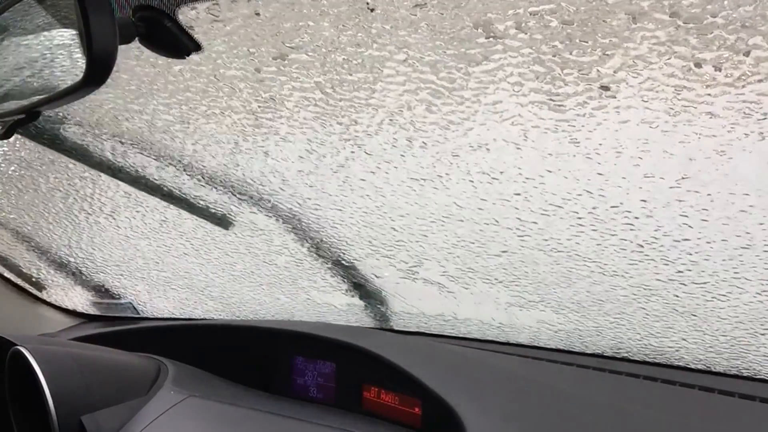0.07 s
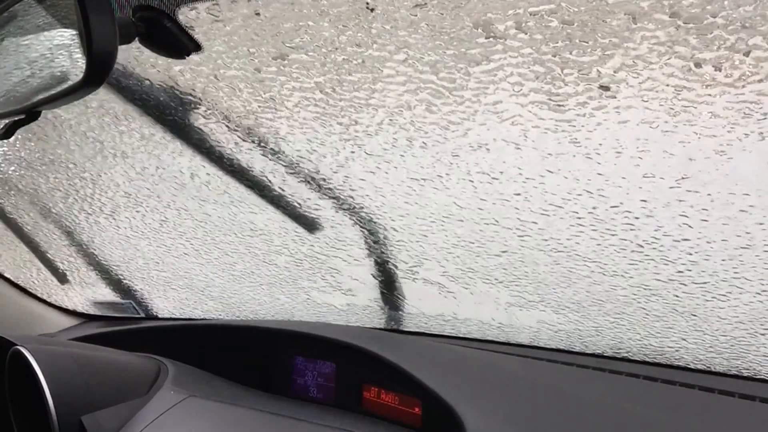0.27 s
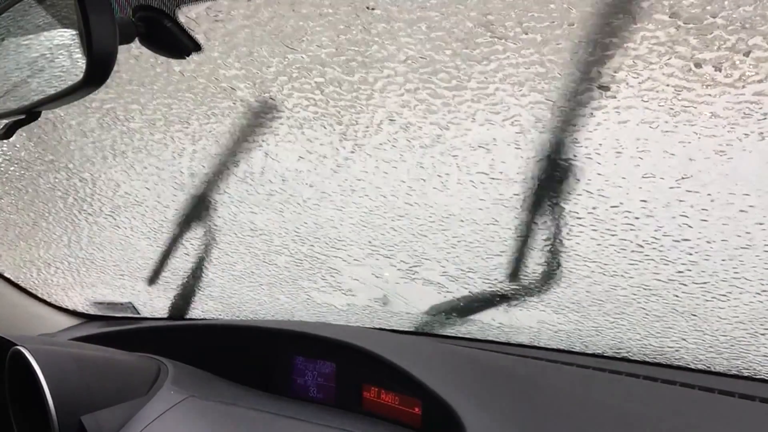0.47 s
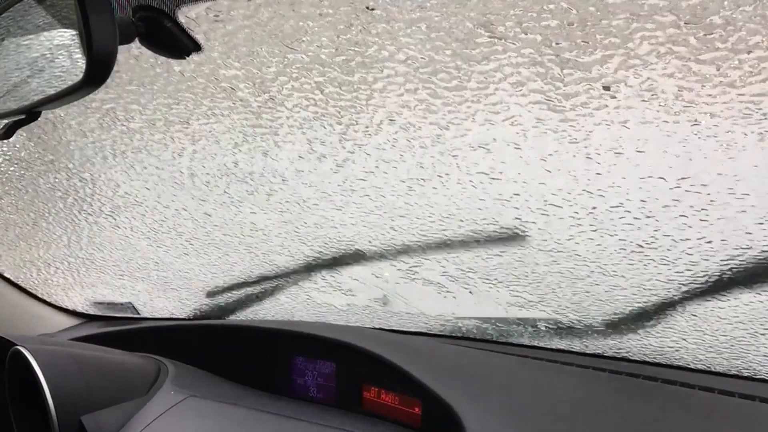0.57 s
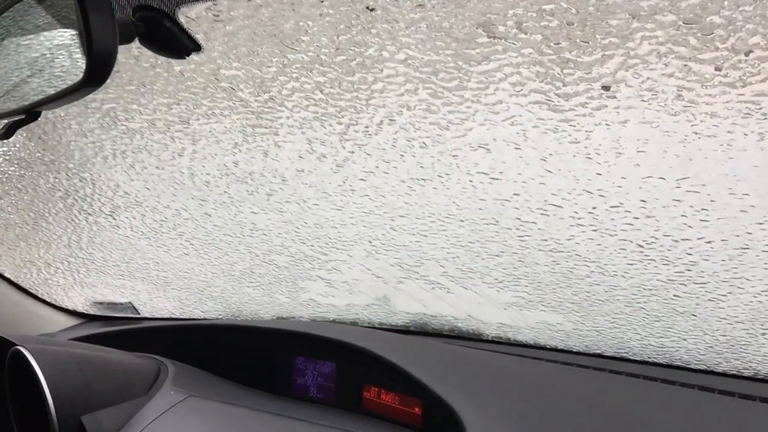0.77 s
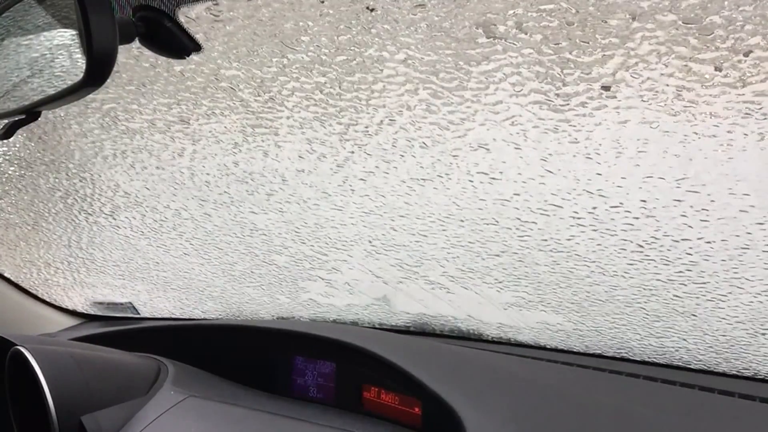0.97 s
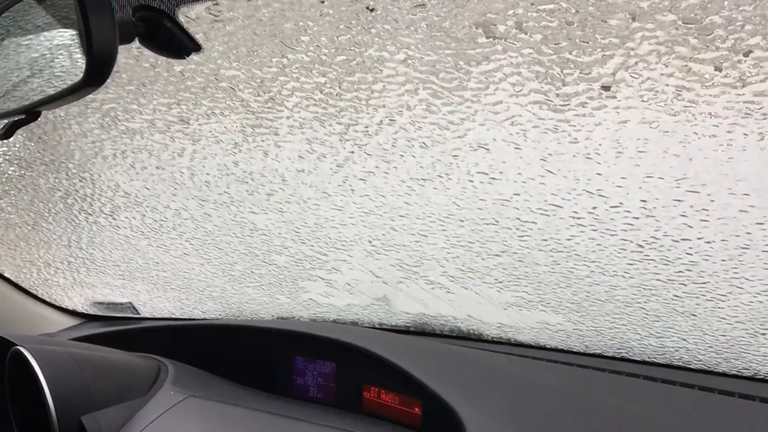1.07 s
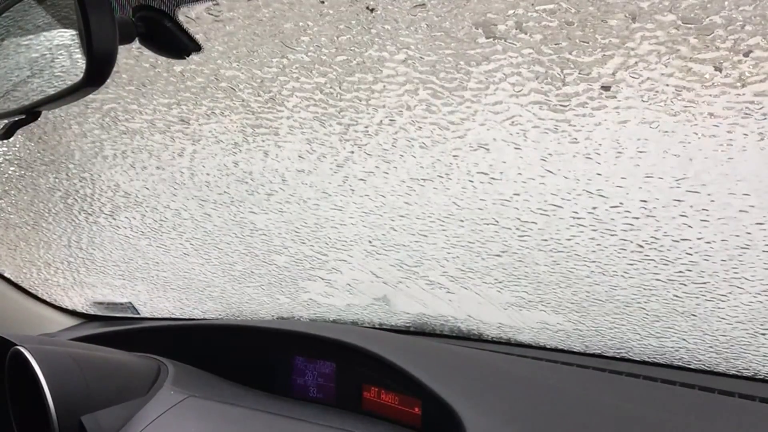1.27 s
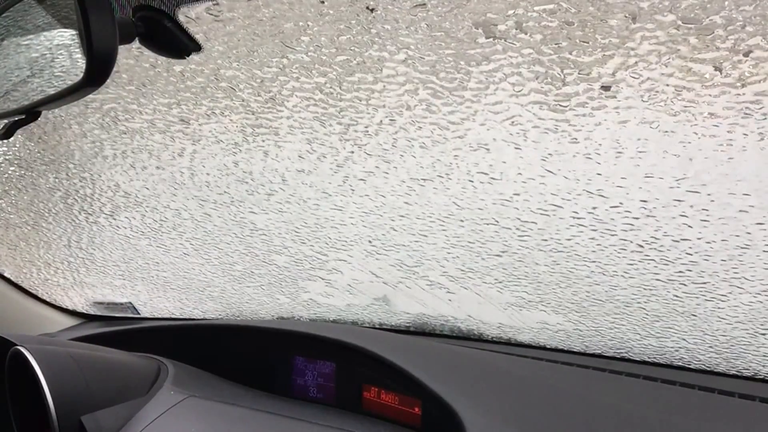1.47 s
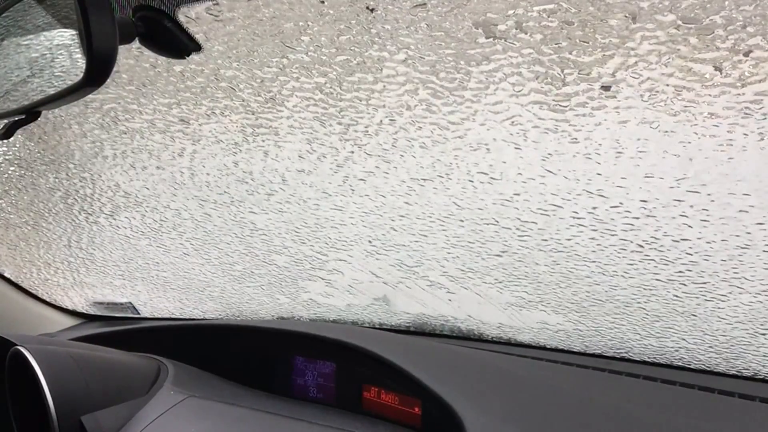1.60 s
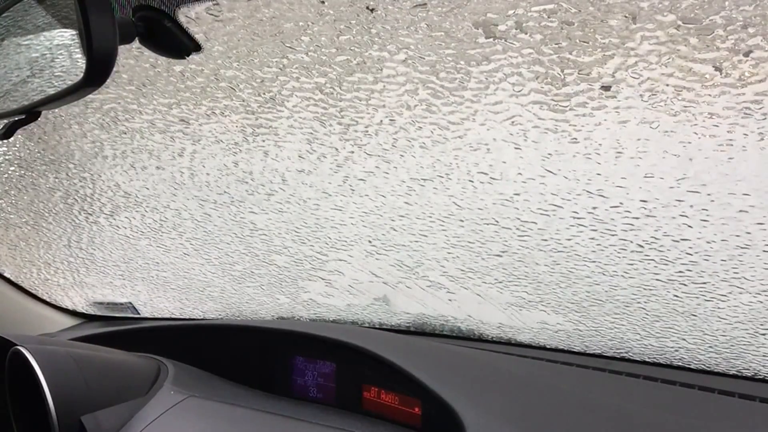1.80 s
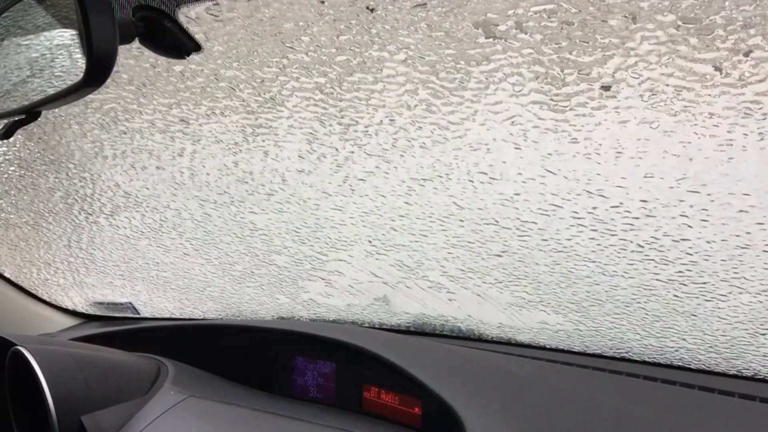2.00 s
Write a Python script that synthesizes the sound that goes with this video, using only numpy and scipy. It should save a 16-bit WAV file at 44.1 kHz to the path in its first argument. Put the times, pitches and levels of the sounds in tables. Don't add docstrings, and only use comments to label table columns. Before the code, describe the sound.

Wiper blades scrape over a frozen windshield, heard close inside a car. A coarse, juddering rasp ends by 0.2 seconds; light clinks and a low thump mark the turnaround. From 0.27 a longer gritty scrape with small squeaks and crackling ice runs to a heavy knock near 0.83, then a brief creep and clunk at 0.94. Afterwards quiet low engine rumble, faint fan hiss, soft body nudges and tiny sleet ticks until 2 seconds.

```python
import sys
import numpy as np
from scipy import signal
from scipy.fft import rfft, irfft, next_fast_len
from scipy.io import wavfile
from scipy.ndimage import uniform_filter1d, map_coordinates

SR = 44100
rng = np.random.default_rng(int(sys.argv[2]) if len(sys.argv) > 2 else 0)


def amplitude_ratio(level_db):
    exponent = np.asarray(level_db, float) / 20
    return 10 ** exponent


def transcribe(u):
    v = np.clip(np.atleast_2d(u).T, -1, 1)
    q = np.round(v * 32767).astype(np.int16)
    wavfile.write(sys.argv[1], SR, q)


N = 90184


def unit(x):
    return x / np.sqrt(np.mean(x ** 2) + 1e-20)


def along(points, hz):
    f, v = np.transpose(points)
    return np.interp(np.log(hz + 1), np.log(f + 1), v)


def wobble(rate):
    knots = rng.standard_normal(int(N * rate / SR) + 4)
    return map_coordinates(knots, [np.arange(N) * rate / SR])


def filtered(x, response):
    m = next_fast_len(N + 8192)
    return irfft(rfft(x, m) * response(np.fft.rfftfreq(m, 1 / SR)), m)[..., :N]


def add(track, s, sound):
    part = track[round(s * SR):][:len(sound)]
    part += sound[:len(part)]


def overlay(start, grains):
    at = start[:, None] + np.arange(grains.shape[1])
    total = np.bincount(at.ravel(), grains.ravel(), minlength=N)[:N]
    return total / np.std(total[:SR])


def ring(hz, t60, attack_s):
    t = np.arange(SR // 4) / SR
    return np.sin(2 * np.pi * hz * t) * amplitude_ratio(-60 * t / t60) * (1 - np.exp(-t / attack_s))


def held_notes(rows):
    t = np.arange(N) / SR
    out = np.zeros(N)
    for s, db, hz, length in rows:
        swell = amplitude_ratio(db + 1.5) * np.sqrt(2) * np.exp(-((t - s) / length) ** 2)
        out += swell * np.sin(2 * np.pi * hz * (t - s))
    return out


def patchy(depth_db):
    z = signal.stft(rng.standard_normal(N + SR), nperseg=1024)[2]
    field = uniform_filter1d(rng.standard_normal(z.shape), size=7, axis=0)
    field = uniform_filter1d(field, size=8, axis=1)
    return signal.istft(z * amplitude_ratio(depth_db * unit(field)), nperseg=1024)[1][:N]


# multiple of the shaft rate, level in dB.
SHAFT_ORDERS = [(1, -63), (2, -55), (4, -67), (5, -62), (6, -63), (7, -66), (10, -64), (21, -72), (22, -73)]
# frequency in Hz, level in dB per Hz.
RUMBLE_SPECTRUM = [(30, 0.5), (45, 2.5), (118, -0.5), (148, -9), (420, -11), (500, -20), (620, -16),
                   (950, -24)]
# frequency in Hz, level in dB per Hz.
FAN_SPECTRUM = [(900, -7.5), (1450, -14), (4200, -23), (4550, -25.5), (5000, -25.5), (9000, -31),
                (10500, -34.5), (12500, -34.5)]


def idle():
    shaft_hz, boom_hz, boom_db, throb_hz = 40.25, 112, -57, 23.4
    rumble_db, fan_db = -47.5, -69
    t = np.arange(N) / SR

    turn = 2 * np.pi * np.cumsum(shaft_hz * (1 + 0.0017 * wobble(3.18))) / SR
    hum = np.zeros(N)
    for k, db in SHAFT_ORDERS:
        level = amplitude_ratio(db + 3 + 4 * wobble(8.2))
        hum += level * np.sin(k * turn + 7 * rng.random() + 0.48 * wobble(14))

    lope_db = 4 * np.cos(2 * np.pi * 11 * t)
    boom_level = amplitude_ratio(boom_db + lope_db + 2.5 * wobble(9.5))
    boom = boom_level * np.sin(2 * np.pi * np.cumsum(boom_hz * (1 + 0.036 * wobble(8.2))) / SR)

    throb_db = 1.5 * np.sin(2 * np.pi * throb_hz * t + wobble(1.2) + 2.3)
    throb = amplitude_ratio(throb_db + 0.3 * wobble(5.0) + 0.22 * lope_db)
    rumble = filtered(patchy(1.3) * throb,
                      lambda f: amplitude_ratio(along(RUMBLE_SPECTRUM, f)) / (1 + (f / 1000) ** 12))
    hiss = filtered(patchy(1.1) * amplitude_ratio(0.65 * wobble(7.0)),
                    lambda f: amplitude_ratio(along(FAN_SPECTRUM, f)) / (1 + (950 / (f + 1)) ** 6))
    return hum + boom + amplitude_ratio(rumble_db) * unit(rumble) + amplitude_ratio(fan_db) * unit(hiss)


# centre in seconds, level in dB, pitch in Hz, length in seconds.
MOUNT_ROCKS = [
    (1.005, -44, 76, .025),
    (1.105, -45, 117, 0.031),
    (1.24, -48.5, 119, 0.028),
    (1.6, -53, 109, 0.027),
    (1.715, -44.5, 111.5, 0.026),
    (1.797, -48.5, 85, 0.019),
    (1.91, -48.5, 102, 0.034),
]


def rocks():
    return held_notes(MOUNT_ROCKS)


# first touch in seconds, level in dB, pitch in Hz.
SLEET_GRAINS = [(1.0337, -59, 2070), (1.125, -58, 3150), (1.148, -55, 3200), (1.155, -57, 3650),
                (1.163, -56, 2600), (1.168, -58, 3200), (1.1862, -55, 2460), (1.2864, -57, 2470),
                (1.4478, -55, 2920), (1.4745, -57, 2910), (1.485, -53, 2880), (1.487, -58, 2350),
                (1.52, -57, 2700), (1.535, -60, 3300), (1.5844, -61, 2540), (1.723, -53, 3100),
                (1.7604, -61, 3300), (1.8844, -60, 2450), (1.9899, -61, 2850), (2.015, -60, 3200)]


def sleet():
    out = np.zeros(N)
    hops = rng.random((len(SLEET_GRAINS), 7, 3))
    for (s, db, hz), grain in zip(SLEET_GRAINS, hops):
        for k, (late, bend, size) in enumerate(grain):
            tick = ring(hz * (0.93 + 0.14 * bend), t60=.013, attack_s=0.0005)
            add(out, s + .003 * late * k, amplitude_ratio(db - 7 - 4.3 * size) * tick)
    return out


# start in seconds, level in dB, pitch in Hz, 60 dB decay in seconds.
LINKAGE_THUMPS = [
    (.2785, -27, 66, .25),
    (.72, -35, 62, .25),
    (.8265, -20, 330, .025),
    (.8535, -24, 84, .13),
    (.9405, -29, 250, .06),
    (.9385, -37, 850, .05),
]
# start in seconds, level in dB, pitch in Hz, 60 dB decay in seconds.
ARM_CLINKS = [(.179, -44, 3700, .02), (.2, -49, 2900, .03), (.214, -50, 2700, .04), (.215, -54, 3300, .03),
              (.2457, -43, 3400, .04), (.2465, -44, 2700, .045), (.248, -55, 4500, .03),
              (.262, -46, 2900, .03), (.263, -50, 3500, .02), (.288, -42, 2870, .03),
              (.2985, -40, 2760, .04), (.299, -46, 5300, .025), (.277, -62, 14000, .015),
              (.299, -54, 14500, .02), (.299, -57, 11900, .015), (.826, -33, 2500, .03),
              (.828, -37, 3300, .02), (.906, -44, 2600, .04), (.912, -42, 3100, .04),
              (.925, -42, 2800, .04), (.931, -43, 3400, .03), (.9385, -42, 1420, .05),
              (.942, -36, 480, .07), (.945, -36, 130, .35), (.95, -42, 290, .15), (.95, -46, 1000, .07),
              (.955, -48, 680, .07), (.988, -61, 2450, .03), (1.558, -49, 620, .03)]


def thumps():
    out = np.zeros(N)
    for s, db, hz, t60 in LINKAGE_THUMPS + ARM_CLINKS:
        add(out, s, -amplitude_ratio(db) * ring(hz, t60, attack_s=0.2 / hz))
    return out


# centre in seconds, level in dB, pitch in Hz, length in seconds.
ARM_SHUDDERS = [(.02, -39, 177, 0.03), (.03, -36.5, 116, 0.028), (.05, -33.5, 374.3, 0.019),
                (.09, -38, 254, 0.018), (.13, -37, 269, 0.024), (.145, -35.5, 146, 0.013),
                (.34, -38.5, 153, 0.026), (.39, -37.5, 166.6, 0.031), (0.492, -37.5, 114, 0.017),
                (0.496, -42, 57, 0.057), (.53, -36.5, 162, 0.012), (0.567, -40, 100, 0.023),
                (0.582, -38, 397.5, 0.02), (0.594, -47, 55, 0.028), (.615, -33.5, 136, 0.0156),
                (.63, -41, 184, 0.025), (.665, -37, 271, 0.0067), (.68, -41, 160, 0.011),
                (0.728, -38.5, 259, 0.016), (.74, -44, 138, 0.0094), (0.772, -45, 71, .03),
                (0.794, -40.5, 398.3, 0.052), (.82, -36, 131, 0.012), (.835, -34, 375, 0.013),
                (0.913, -50, 60, .025)]


def shudders():
    return held_notes(ARM_SHUDDERS)


# centre in seconds, level in dB, length in seconds.
ICE_RIDGES = [(0.072, -63, 0.061), (.187, -70, .002), (0.206, -79, 0.00076), (0.216, -67, 0.0011),
              (0.246, -71, 0.0015), (0.268, -75, .0015), (0.278, -70, 0.0013), (0.287, -77, .002),
              (0.3005, -63, .003), (.316, -71, 0.0013), (0.352, -68, 0.0026), (0.357, -66, .002),
              (0.366, -64, .0015), (0.406, -56, 0.0011), (.422, -64, .0015), (0.497, -56, 0.014),
              (0.531, -57.5, 0.01), (0.552, -56, 0.0071), (0.568, -61.5, 0.013), (0.615, -62, 0.089),
              (0.69, -65, 0.0059), (0.718, -54, 0.022), (0.791, -58, 0.032), (.815, -72, 0.0023),
              (0.826, -58, 0.003), (0.848, -69, 0.012), (0.907, -67.5, 0.0063), (0.93, -69, 0.0022),
              (0.931, -75, .003)]
# frequency in Hz, level in dB.
SPLINTER_SPECTRUM = [(1500, -23), (3000, 15.5), (5500, 18), (8500, 7.5), (10300, -1), (12000, 1.5),
                     (14500, -4), (15700, -3)]


def ridges():
    t = np.arange(N) / SR
    swell = sum(amplitude_ratio(db) * np.exp(-((t - s) / length) ** 2) for s, db, length in ICE_RIDGES)
    spikes = unit(rng.standard_normal(N) * amplitude_ratio(2 * rng.standard_normal(N)))
    return filtered(spikes * swell, lambda f: amplitude_ratio(along(SPLINTER_SPECTRUM, f)))


# time in seconds, scrape level in dB, long arm judder in Hz, short arm judder in Hz,
# judder over scrape in dB.
BLADE_STROKES = [
    [(0, -38, 145, 372, 3.5), (.064, -38.5, 116, 303, 2), (.156, -42.5, 161, 278, 8.5),
     (.185, -47.5, 154, 254, 0.5), (.22, -62, 140, 265, 5), (.238, -67.5, 133, 260, 14)],
    [(.256, -49, 122, 282, 6), (.296, -45, 138, 319, 1.5), (.42, -42, 156.7, 309, 4),
     (.52, -41, 98, 272, 5.5), (.63, -39, 161, 288, 5), (.72, -40, 194.4, 267, 6),
     (.79, -39.5, 162, 374, 5.5), (.832, -37, 137.6, 371, 2), (.885, -53, 119.4, 248, 7.5)],
    [(.9, -54, 110, 304, 6), (.917, -43.5, 109, 287, 0), (.93, -48.5, 116, 306, -4),
     (.941, -44, 128, 301.4, 8), (.956, -73, 130, 290, -2), (.975, -71, 130, 280, 18)],
]


def stroke():
    s, db, *rest = np.transpose(np.concatenate(BLADE_STROKES))
    t = np.arange(N) / SR
    fall_db = 400 * np.maximum(t - s[-1], 0)
    return [np.interp(t, s, db) - fall_db] + [np.interp(t, s, c) for c in rest]


def judder(pitch_hz, spread):
    count, jerks_per_s, cycles = 500, 330, 5.5
    rows = np.c_[rng.random(count), rng.standard_normal((count, 2))]
    start = ((np.arange(count) + rows[:, 0]) / jerks_per_s * SR).astype(int)
    start = np.minimum(start, N - 1)
    hz = np.clip(pitch_hz[start] * np.exp(spread * rows[:, 1]), 55, 600)[:, None]
    t = np.arange(4000) / SR
    u = t * hz / cycles
    force = amplitude_ratio(2.2 * rows[:, 2:]) * np.sqrt(hz)
    return overlay(start, np.sin(2 * np.pi * hz * t) * u * np.exp(-4 * u) * force)


def arms(level_db, long_hz, short_hz, over_db):
    shake = judder(long_hz, .23) + judder(short_hz, 0.1806)
    shake += amplitude_ratio(-3) * judder(np.full(N, 148), .22)
    return shake * amplitude_ratio(-42.5 + .75 * (level_db + 41) + over_db)


def squeaks(level_db):
    count, notes_per_s, top_hz, spread, peak_s, glide = 420, 420, 2600, .36, .008, 2
    rows = np.c_[rng.random((count, 2)), rng.standard_normal((count, 3))]
    start = ((np.arange(count) + rows[:, 0]) / notes_per_s * SR).astype(int)
    t = np.arange(2000) / SR
    side = np.where(rows[:, 1:2] < .5, 2, -.6)
    hz = np.clip(top_hz * np.exp(-spread * np.abs(rows[:, 2:3]) * side), 600, 3500)
    tone = np.sin(2 * np.pi * hz * t * (1 + glide * rows[:, 3:4] * t))
    swell = (t / peak_s) * np.exp(-t / peak_s) ** 1.5
    return overlay(start, tone * swell * amplitude_ratio(2 * rows[:, 4:])) * amplitude_ratio(level_db - 8)


# frequency in Hz, level in dB per Hz.
GLASS_SPECTRUM = [(300, -23), (470, -5), (1800, -14.5), (2700, -10.5), (5000, -25), (7000, -33),
                  (10300, -46), (15600, -54)]
# frequency in Hz, width in Hz, lift in dB.
GLASS_MODES = [(710, 19, -1), (1070, 220, 2), (1453, 5.5, 7), (2500, 450, 0.5), (2870, 110, -1),
               (3690, 320, 2), (6500, 310, 4)]


def glass(f):
    lift_db = sum(db / (1 + ((f - hz) / width) ** 2) for hz, width, db in GLASS_MODES)
    return amplitude_ratio(along(GLASS_SPECTRUM, f) + lift_db)


def scrape(level_db):
    bumps_per_s, spread_db, flutter_db = 12000, 2.7, 1.1
    rasp_hz, fizz_hz = 2000, 3800
    chance, sign, size = rng.random((3, N))
    bumps = (chance < bumps_per_s / SR) * np.sign(sign - .5) * amplitude_ratio(-spread_db * np.log(size + 0.0059))
    flutter = 0.24 * wobble(60) + wobble(140)
    bumps = unit(bumps) * amplitude_ratio(level_db + flutter_db * flutter)

    def low(f):
        return 1 / (1 + (f / rasp_hz) ** 4)

    def high(f):
        return 1 - 1 / (1 + (f / fizz_hz) ** 6)

    up_stroke = np.arange(N) < .238 * SR
    rasp_db = .33 * (level_db + 33.5) + 4 * up_stroke
    fizz_db = .55 * (level_db + 39.0)
    rasp = filtered(bumps * amplitude_ratio(rasp_db), lambda f: glass(f) * low(f))
    fizz = filtered(bumps * amplitude_ratio(fizz_db), lambda f: glass(f) * high(f))
    body = filtered(bumps, lambda f: glass(f) * (1 - low(f)) * (1 - high(f)))
    norm = np.sqrt(np.mean(glass(np.linspace(1500, 5000, num=400)) ** 2) * 7000 / SR)
    return (rasp + fizz + body) / norm


def cabin(x):
    t = np.arange(SR // 4) / SR
    tail = rng.standard_normal(len(t)) * amplitude_ratio(-60 * t / 0.07)
    wet = signal.fftconvolve(x, tail / np.linalg.norm(tail))[:N]
    return x + amplitude_ratio(-8) * filtered(wet, lambda f: 1 / (1 + (f / 4000) ** 2))


def scene():
    level_db, long_hz, short_hz, over_db = stroke()
    near = arms(level_db, long_hz, short_hz, over_db) + scrape(level_db) + ridges() + thumps()
    near += sleet() + shudders() + rocks() + squeaks(level_db)
    return (cabin(near) + idle())[None]


def top_cut(x):
    return signal.sosfilt(signal.butter(12, 15670, fs=SR, output="sos"), x)


def record(dry):
    mix = filtered(dry, lambda f: (f < 15680) / np.sqrt(1 + (37 / (f + 1)) ** 20))
    return top_cut(mix)


dry = scene()
out = record(dry)
transcribe(out)
```